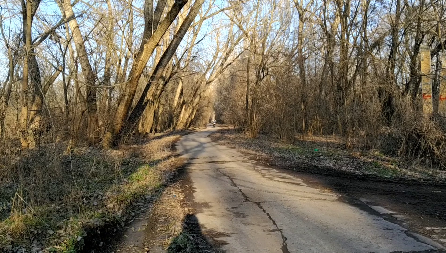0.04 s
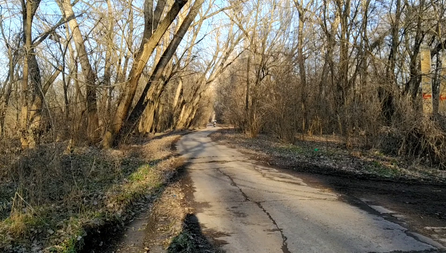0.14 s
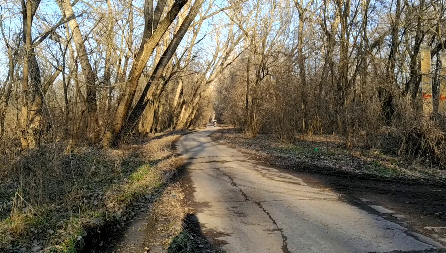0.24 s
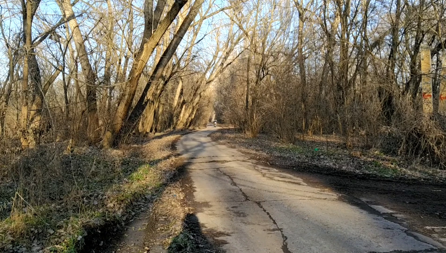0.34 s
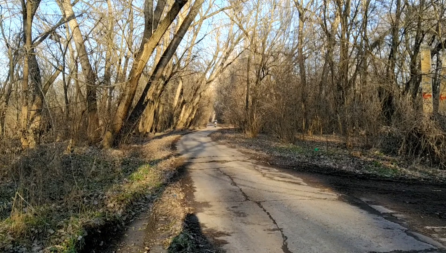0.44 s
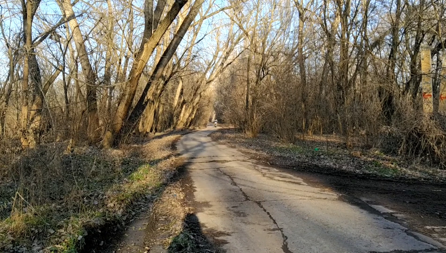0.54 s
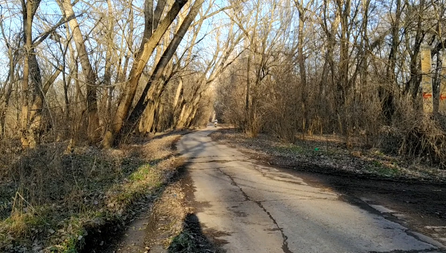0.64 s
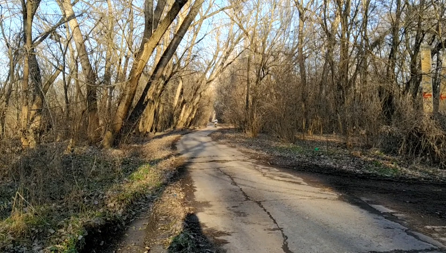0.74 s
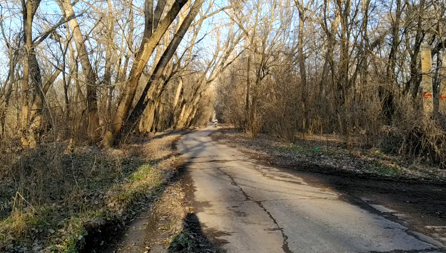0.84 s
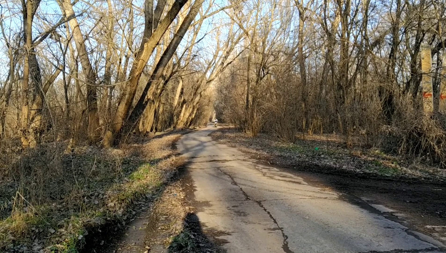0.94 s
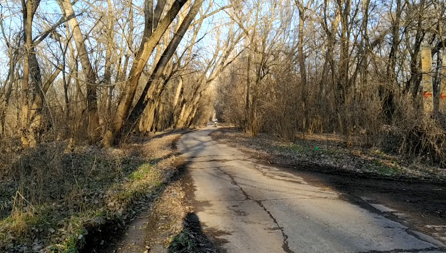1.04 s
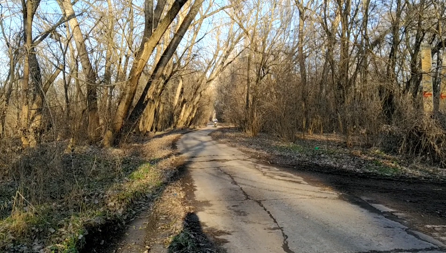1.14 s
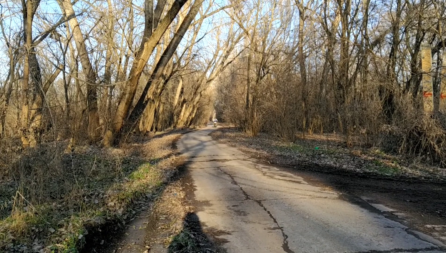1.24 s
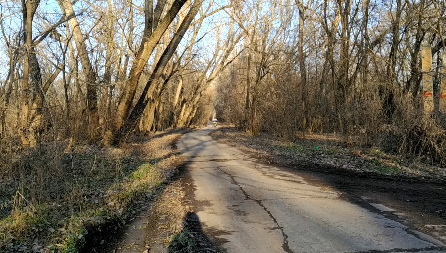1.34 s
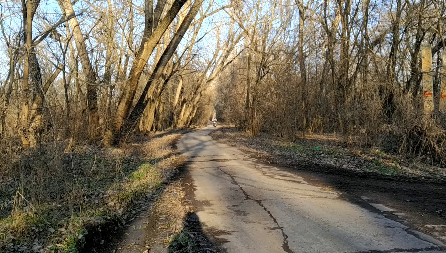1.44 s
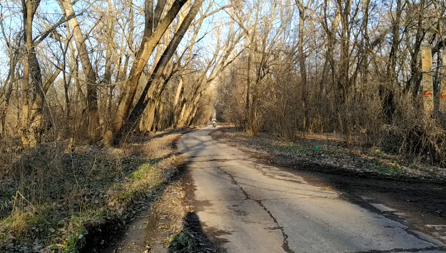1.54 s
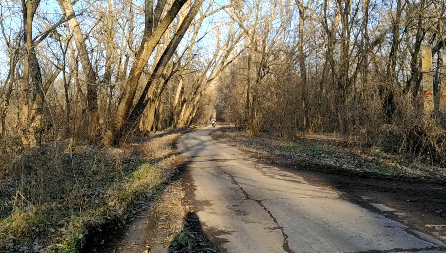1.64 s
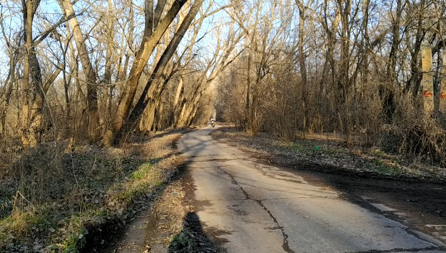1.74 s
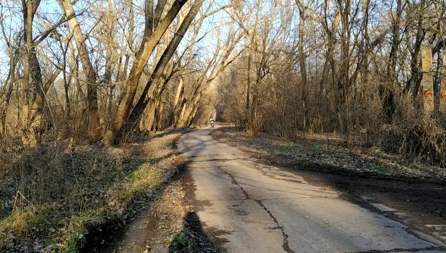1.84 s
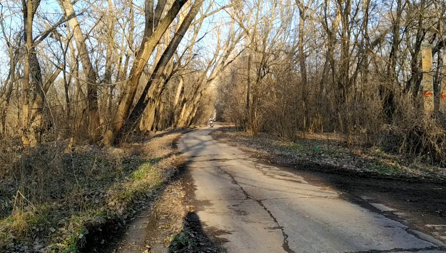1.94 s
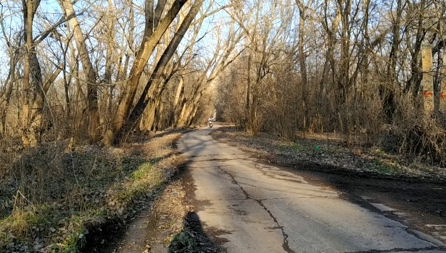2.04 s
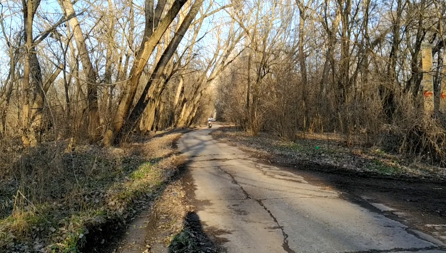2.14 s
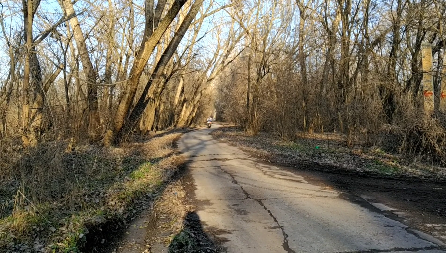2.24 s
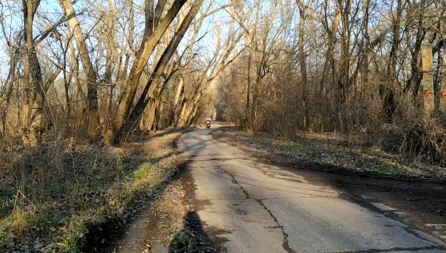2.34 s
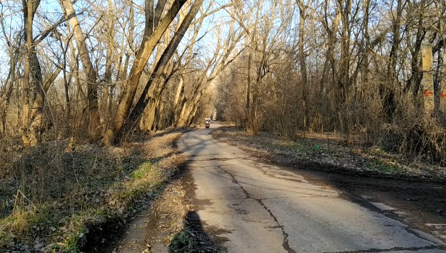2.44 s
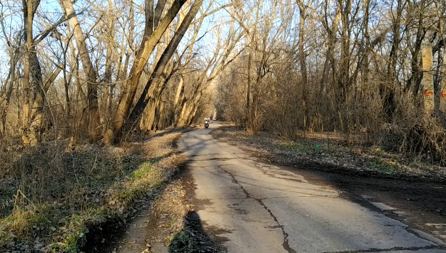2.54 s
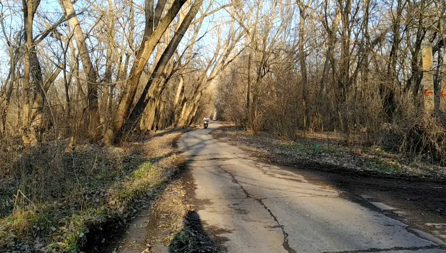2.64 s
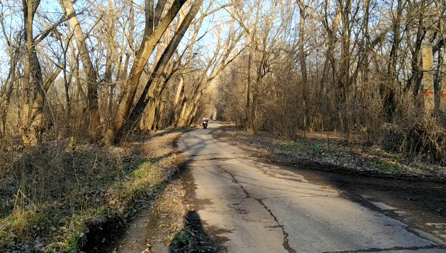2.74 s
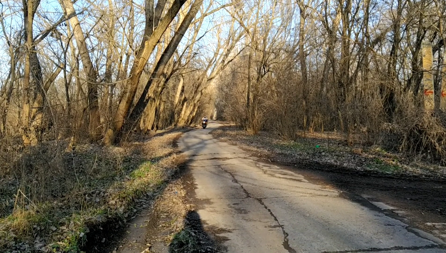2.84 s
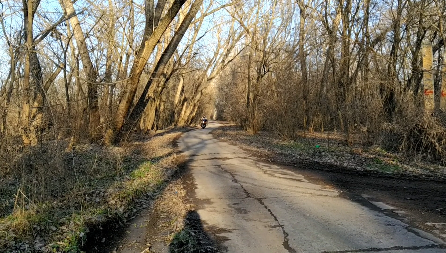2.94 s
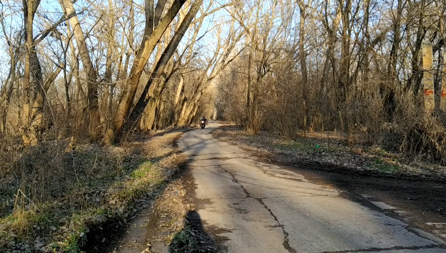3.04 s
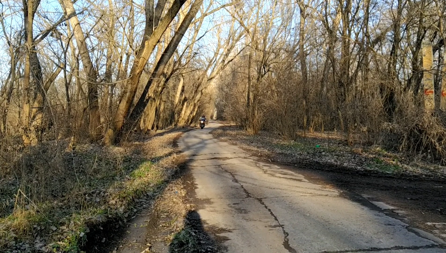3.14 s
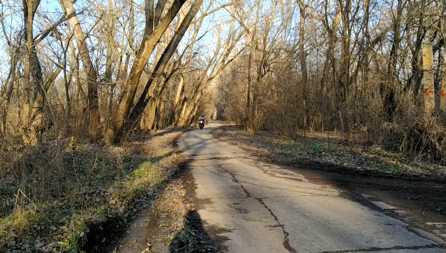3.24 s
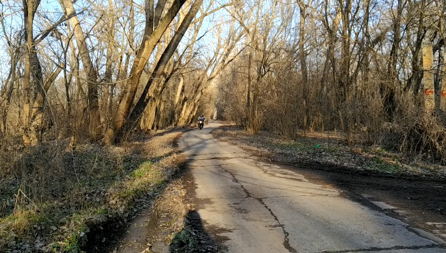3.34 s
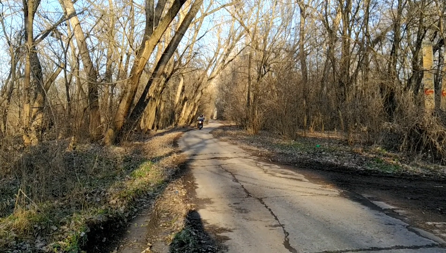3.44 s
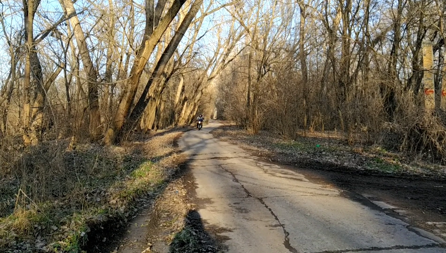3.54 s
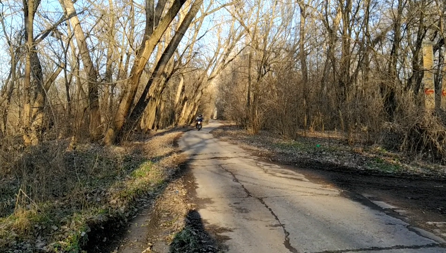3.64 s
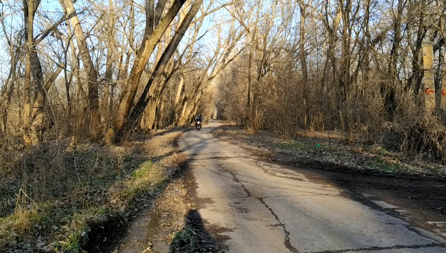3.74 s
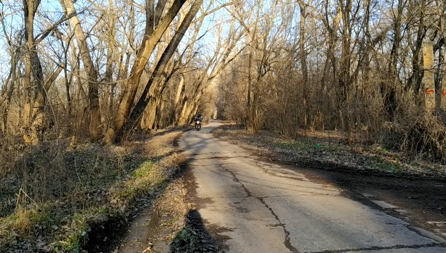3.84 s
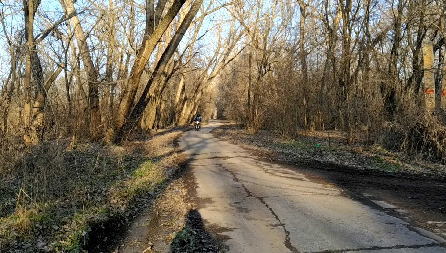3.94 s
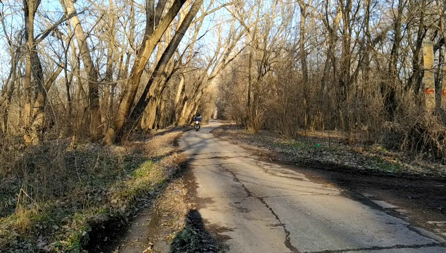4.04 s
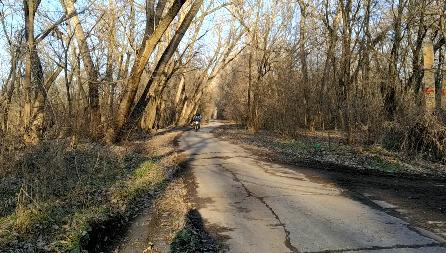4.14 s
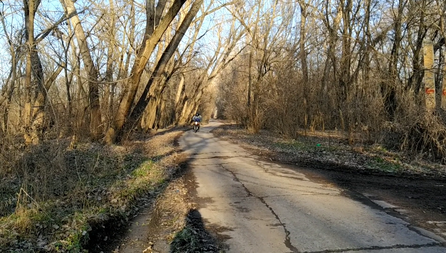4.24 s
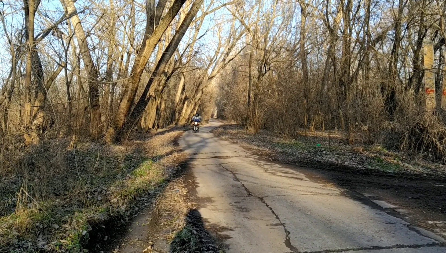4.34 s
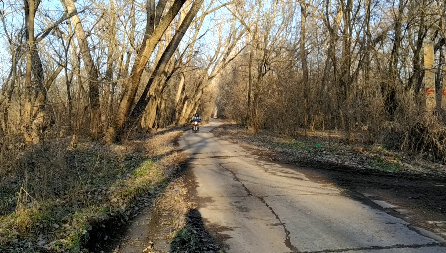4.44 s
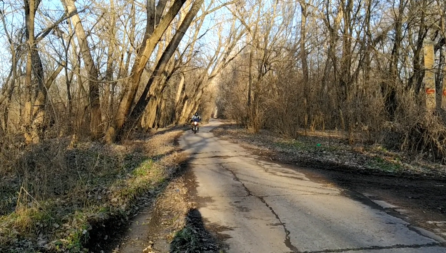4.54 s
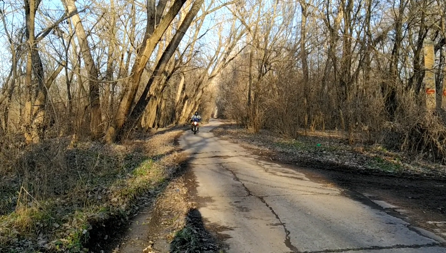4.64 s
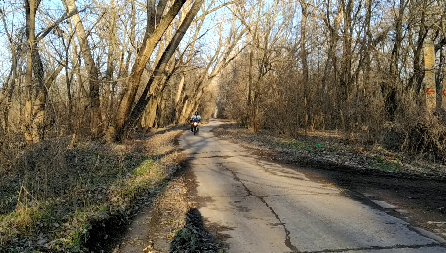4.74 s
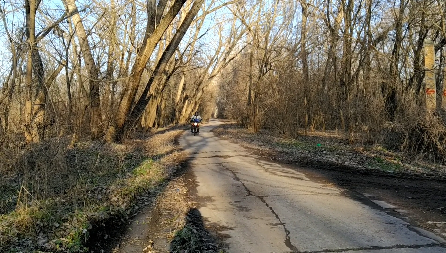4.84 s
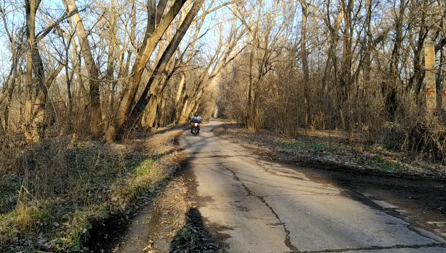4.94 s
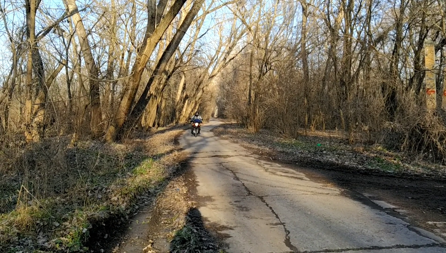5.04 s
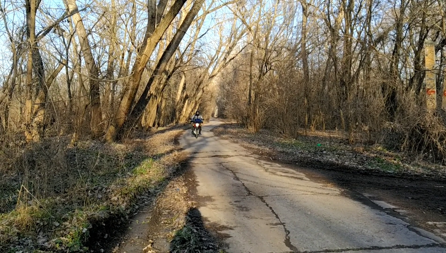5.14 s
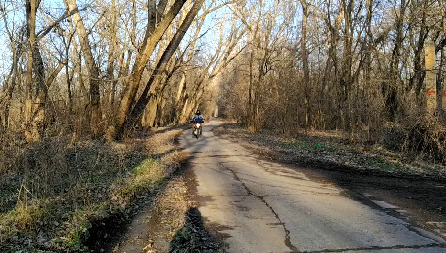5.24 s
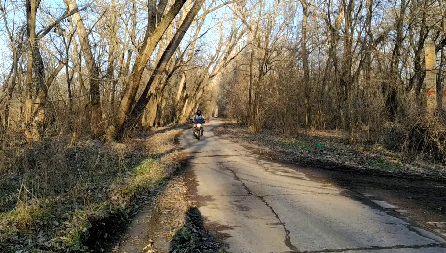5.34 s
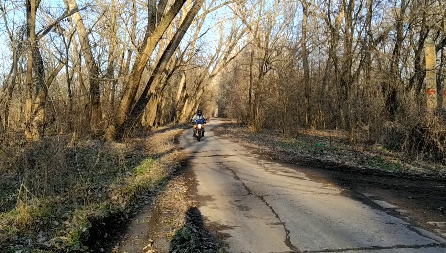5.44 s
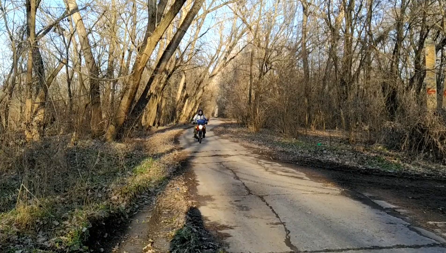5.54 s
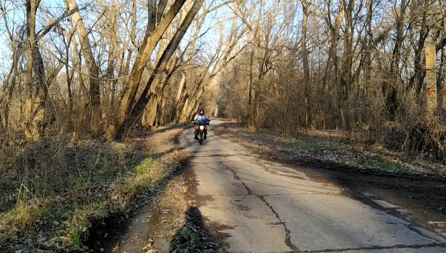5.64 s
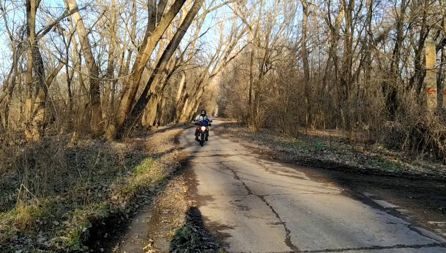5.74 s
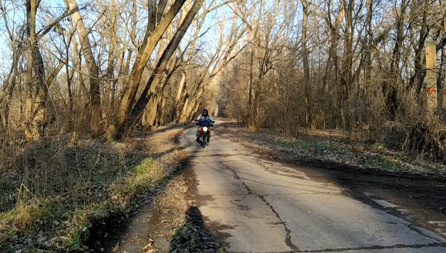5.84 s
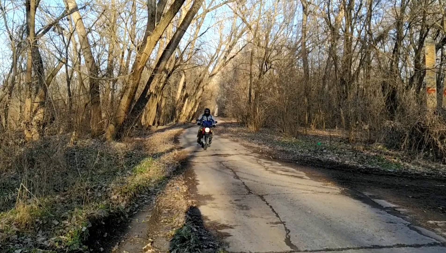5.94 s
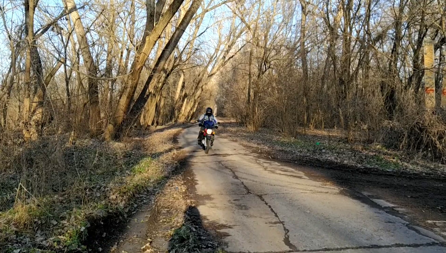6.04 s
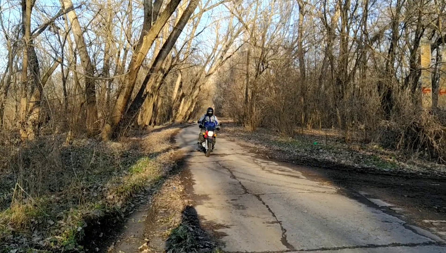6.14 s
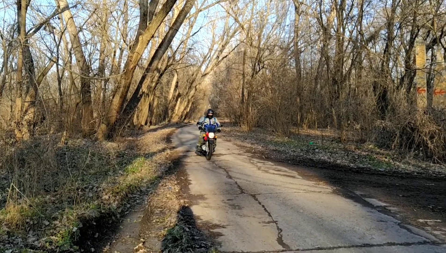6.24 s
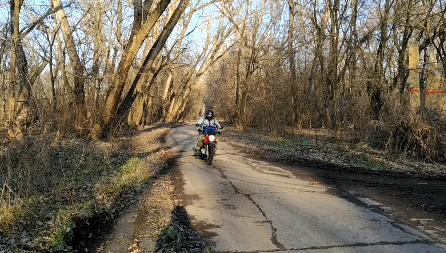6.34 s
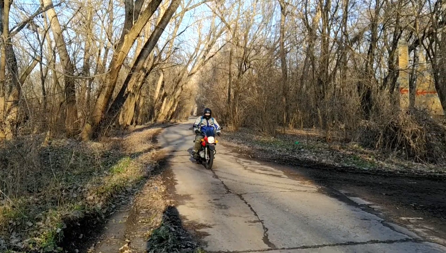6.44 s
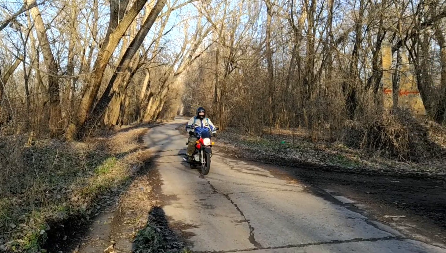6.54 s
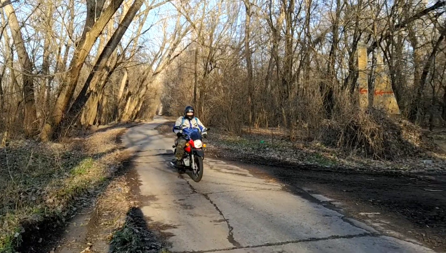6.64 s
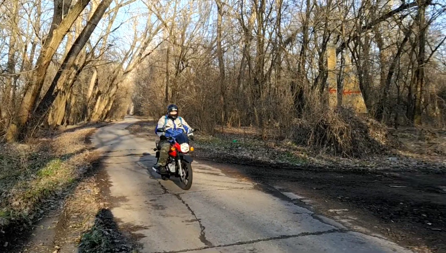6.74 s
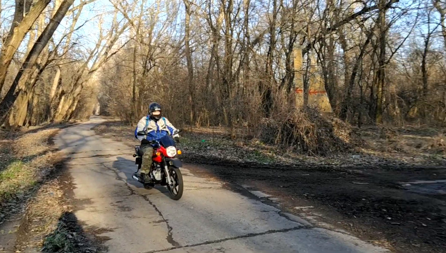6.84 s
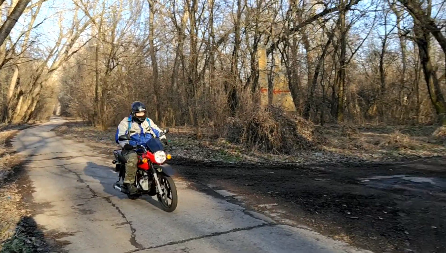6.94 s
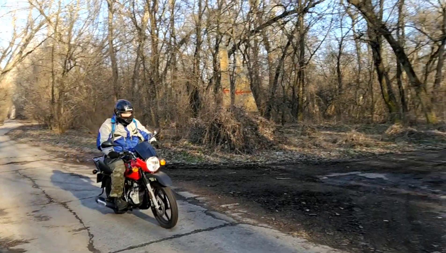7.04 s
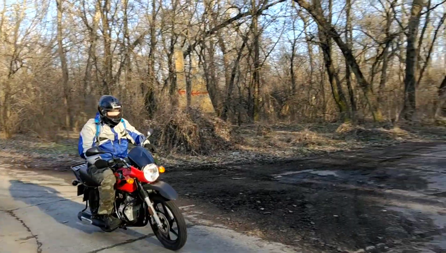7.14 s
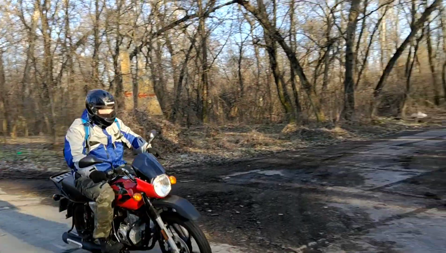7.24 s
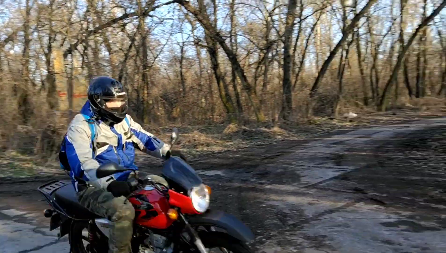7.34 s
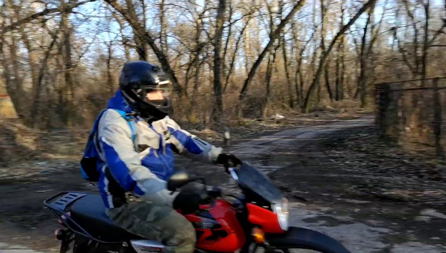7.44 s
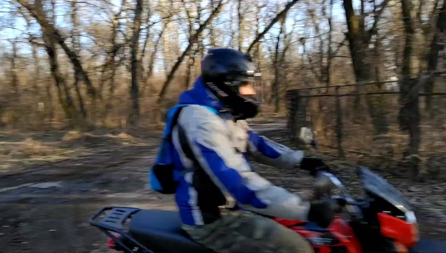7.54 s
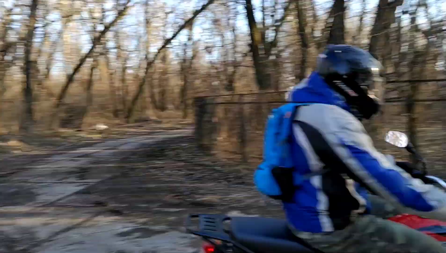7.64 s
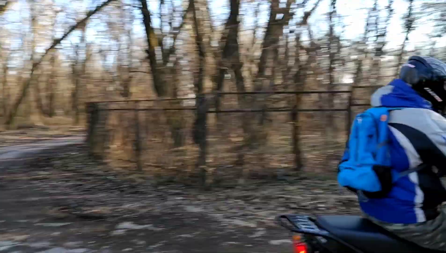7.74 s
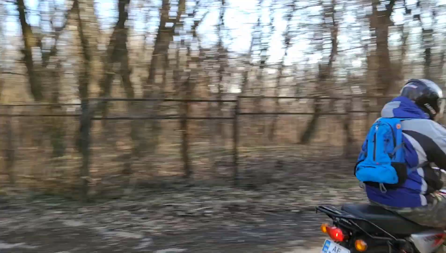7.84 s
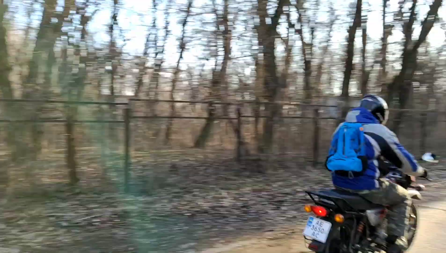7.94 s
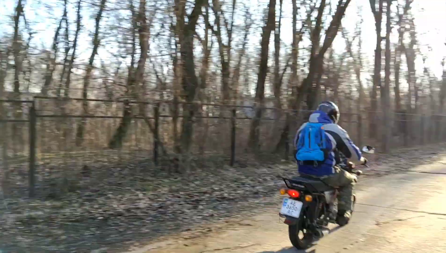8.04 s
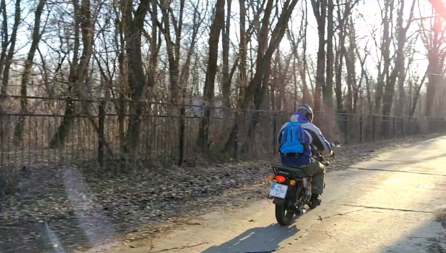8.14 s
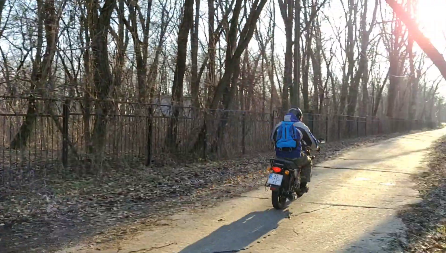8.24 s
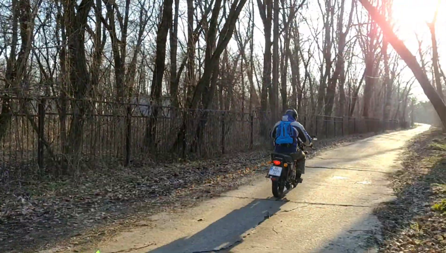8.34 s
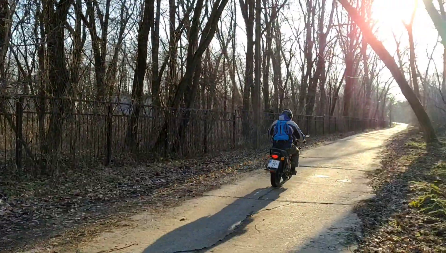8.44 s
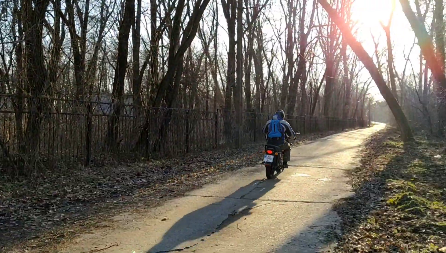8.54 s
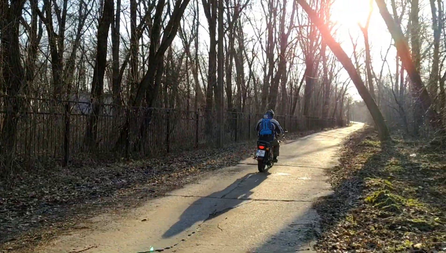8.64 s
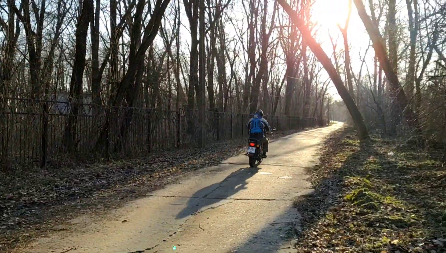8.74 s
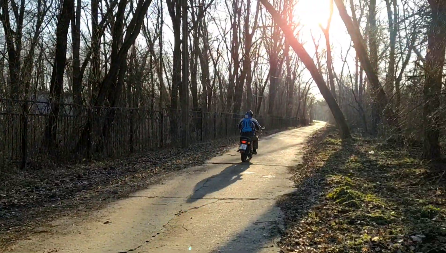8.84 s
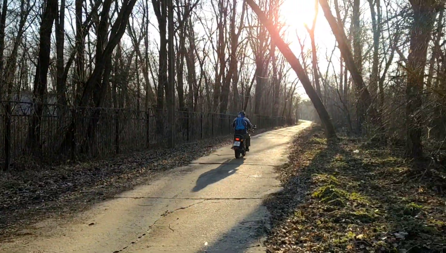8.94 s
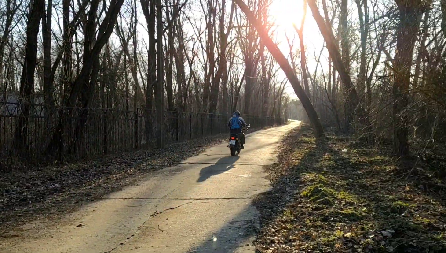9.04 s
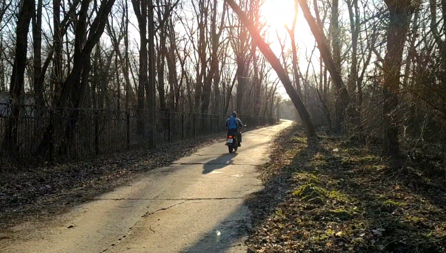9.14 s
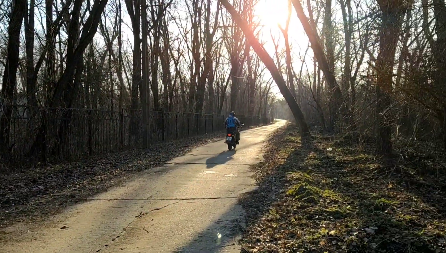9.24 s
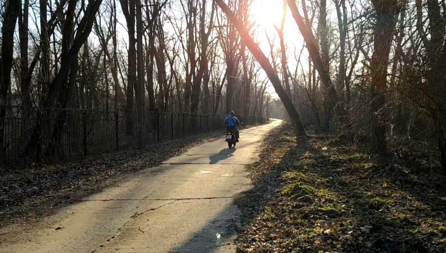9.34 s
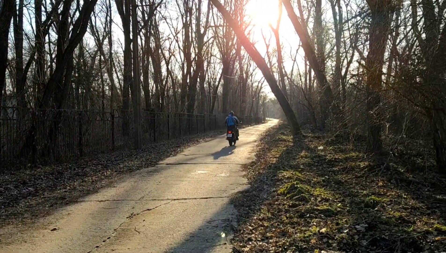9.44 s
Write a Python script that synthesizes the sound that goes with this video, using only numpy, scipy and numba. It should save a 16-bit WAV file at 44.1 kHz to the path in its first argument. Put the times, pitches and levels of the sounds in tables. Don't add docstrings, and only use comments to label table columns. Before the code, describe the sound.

Thumping small motorbike exhaust grows over faint wind and ticking twigs, eases off, then surges past with tyre hiss and recedes down the path.

```python
import sys
import numpy as np
from scipy import signal
from scipy.fft import rfft, irfft, next_fast_len
from scipy.io import wavfile
from scipy.ndimage import uniform_filter1d, map_coordinates
from numba import njit

SR = 44100
rng = np.random.default_rng(int(sys.argv[2]) if len(sys.argv) > 2 else 0)


def dump(signal):
    limited = np.clip(np.atleast_2d(signal).T, -1, 1)
    pcm = np.round(limited * 32767).astype(np.int16)
    wavfile.write(sys.argv[1], SR, pcm)


def invert_db(level):
    return 10 ** (np.asarray(level, dtype=float) / 20)


N = 418852


def curves(table):
    s, *columns = np.transpose(table)
    return [np.interp(np.arange(N) / SR, s, c) for c in columns]


def read(table, hz):
    f, v = np.transpose(table)
    return np.interp(np.log(np.maximum(hz, 1)), np.log(f), v)


def unit(x):
    return x / np.sqrt(np.mean(x ** 2))


def shape(x, gain):
    size = next_fast_len(N + 4096)
    return irfft(rfft(x, size) * gain(np.arange(size // 2 + 1) * SR / size), size)[..., :N]


def lowpass(hz, edge_hz, order):
    return 1 / (1 + (hz / edge_hz) ** order)


def walk(rate_hz):
    k = int(SR / rate_hz)
    held = np.repeat(rng.standard_normal(N // k + 1), k)
    return 1.46 * uniform_filter1d(uniform_filter1d(held, k), k)[:N]


def bump(s, half_s):
    return np.exp(-((np.arange(N) / SR - s) / half_s) ** 2)


@njit
def svf(x, hz, width):
    y, b, l = np.empty(len(x)), 0., 0.
    for i in range(len(x)):
        g, k = np.tan(np.pi * hz[i] / SR), width / hz[i]
        v = (b + g * (x[i] - l)) / (1 + g * (g + k))
        b, l, y[i] = 2 * v - b, l + 2 * g * v, k * v
    return y


def distance():
    pass_s, speed_m_s, nearest_m = 7.727, 6.63, 2.505
    return np.hypot(nearest_m, speed_m_s * (np.arange(N) / SR - pass_s))


def stance():
    # start_s, end_s, share_0_1
    coasts = [
        (-.2, 0.897, 0.28),
        (5.205, 6.29, 1),
    ]
    near_m, rear_shows_s, rear_takes_s, throttle_s = 8.9, 7.59, 0.53, 0.071
    t, r_m = np.arange(N) / SR, distance()

    def step(at_s, takes_s):
        return .5 + .5 * np.tanh((t - at_s) / takes_s)
    shut = sum(share * step(a, throttle_s) * (1 - step(b, throttle_s)) for a, b, share in coasts)
    rear = step(rear_shows_s, rear_takes_s)
    return np.array([np.ones(N), shut, rear, 1 / (1 + (r_m / near_m) ** 2), r_m / 10])


def firings(hz, jitter_s, scatter_db):
    cycles = np.cumsum(hz) / SR
    at = np.flatnonzero(np.diff(np.floor(cycles)))
    early_late, size = rng.standard_normal((2, len(at)))
    moved = at + (jitter_s[at] * SR * early_late).astype(int)
    pulses = np.zeros(N)
    pulses[np.clip(moved, 0, N - 1)] = invert_db(scatter_db * size)
    return pulses, cycles % 1


def woods(x, t60_s):
    t = np.arange(8192) / SR
    echoes = rng.standard_normal((2, len(t))) * np.exp(-np.log(1000) * t / t60_s) * (t > .007)
    first, second = signal.fftconvolve(x[None], echoes, axes=1)[:, :N]
    turn = 2 * walk(3)
    return unit(np.cos(turn) * first + np.sin(turn) * second)


def exhaust(pulses, rate_hz, level_db, view):
    # hz, level_db
    thump = [(20, -40), (39, 0), (78, 9), (117, 8.5), (195, 3), (270, 7.5), (320, 8.5), (360, -6.5),
             (440, -34), (500, -14.5), (590, -15), (650, -15.5), (720, -15.5), (960, -19), (3500, -32)]
    # level_db, shut_db, rear_db, close_db, per_10m_db
    pipe_parts = [
        (-37, -2, 4.1, 5.5, 0.98),
        (-41, 15.5, 15, -2, .1),
        (-28.5, -1, 1.4, 3, 0.15),
        (-36, 4, 10.6, 1.5, 0.089),
        (-25.5, -8.5, 0.11, -5.5, 0.058),
        (-34.5, 1, 0.75, 6, .1),
    ]
    edges, pipe_top_hz, bark_top_hz = (3.5, 4.5, 5.5, 6.5), 340, 2200
    patchy_db, misfire_db = 1.7, .6
    shut, rear = view[1], view[2]
    rung = pulses + 1.3 * svf(pulses, np.full(N, 225.), 55.)
    dip = unit(-shape(rung, lambda hz: invert_db(read(thump, hz))))
    echo = woods(dip, .1)
    wet = np.clip(.16 + distance() / 40, 0, .3) + .2 * shut + .08 * (1 - rear)
    thinned_echo = shape(echo, lambda hz: 1 - .7 * lowpass(hz, 175, 12))
    heard = np.sqrt(1 - wet ** 2) * dip + wet * thinned_echo

    mean_hz = np.mean(rate_hz)
    angle = np.cumsum(rate_hz) / mean_hz
    even = np.interp(np.arange(N), angle, heard)
    below = [0 * dip]
    for edge in edges:
        low = shape(even, lambda hz: lowpass(hz, mean_hz * edge, 24))
        below.append(np.interp(angle, np.arange(N), low))
    below.append(shape(heard, lambda hz: lowpass(hz, pipe_top_hz, 16)))
    parts = [unit(high - low) for low, high in zip(below, below[1:])]

    parts[0] = unit(shape(dip, lambda hz: np.exp(-2j * np.pi * hz * .0025) * lowpass(hz, mean_hz * edges[0], 16)))
    parts.append(unit(shape(.8 * dip + echo, lambda hz: (1 - lowpass(hz, pipe_top_hz, 16))
                            * lowpass(hz, bark_top_hz, 2))))
    waver_db = patchy_db * wet / 0.51 + misfire_db * shut
    levels_db = np.array(pipe_parts) @ view
    return invert_db(level_db) * sum(invert_db(db + waver_db * walk(17)) * part for db, part in zip(levels_db, parts))


def rush(phase, roar_db, clatter_db, hiss_db, pan_db, hum_db):
    rush_hz = (800, 2600, 8500)
    # hz, likeness_0_1
    likeness = [(60, 0.95), (300, 0.97), (700, 0.78), (1100, 0.96), (1500, 0), (2300, 0.85), (3500, 0.01),
                (4500, 0.2), (6000, 0.2), (8500, 0.55), (11000, 0)]
    hum_hz = 513
    out, gust = 0, walk(5)
    puff = np.cos(2 * np.pi * phase) + 1.16 * np.cos(4 * np.pi * phase)
    for hz in 40 * 2 ** np.arange(0, 8.6, 1 / 3):
        place = np.interp(np.log(hz), np.log(rush_hz), np.arange(3))
        tilt_db = clatter_db * (1 - abs(place - 1)) + hiss_db * max(place - 1, 0)
        tilt_db = tilt_db + hum_db * np.exp(-(np.log(hz / hum_hz) / 0.37) ** 2)
        band = signal.butter(2, (hz / 1.12, hz * 1.12), "band", fs=SR, output="sos")
        mid, side = signal.sosfilt(band, rng.standard_normal((2, N)))
        like = np.clip(read(likeness, hz), 0, 1)
        pair = np.sqrt(1 + like) * mid + np.sqrt(1 - like) * side * np.array([[1], [-1]])
        lean_db = min(hz / 1500, 1) * np.array([pan_db, -pan_db]) / 2
        flicker_db = 0.63 * gust + 0.5 * walk(8) + 1.16 * walk(16)
        throb_db = (0.44 + .5 * (500 < hz < 3000)) * puff
        out = out + invert_db(tilt_db + lean_db + flicker_db + throb_db) * pair
    return out * invert_db(roar_db + 9.0)


def rings(hz, pulses, roar_db, view):
    # level_db, shut_db, rear_db, close_db, per_10m_db
    ring_parts = [
        (-0.5, -2.5, -8.5, -7.5, -2.5),
        (-0.5, -18, -1, -20, -2.5),
        (-14, 8, -5, -28, 0.5),
        (-33.5, -6, 4, 32.5, -19),
        (-11.5, 3.5, 7, -1, 0.15),
        (-22, -1, -13, 20, 1.5),
        (-26, 5, 20.5, -4, 2.5),
    ]
    mesh_order = 32.6
    whine_db, shell_db, cover_db, fin_db, valve_db, intake_db, mouth_db = np.array(ring_parts) @ view
    steady, blows = np.ones(N), unit(pulses * invert_db(1.3 * walk(20)))

    def ring(centre_hz, width_hz, struck=0):
        push = struck * blows + rng.standard_normal(N)
        return unit(svf(svf(push, centre_hz, width_hz), centre_hz, width_hz))
    mesh_hz = 1275 * np.sqrt(mesh_order * hz / 1275)
    whine = invert_db(whine_db + 1.6 * walk(13)) * ring(mesh_hz, 55., 1.2)
    shell = invert_db(shell_db) * ring(775 * (1 + .008 * walk(3)), 50., 2.4)
    cover = ring(870 * (1 + .006 * walk(3)), 40., 2.4) + .7 * ring(1025 * (1 + .015 * walk(3)), 60., 1.5)
    intake = invert_db(intake_db) * ring(590 * steady, 58.0, 2.2)
    mouth = invert_db(mouth_db) * sum(ring(mode_hz * steady, 48.0, 1.35) for mode_hz in (495, 720, 960))
    fins = invert_db(fin_db) * ring(2680 * steady, 280.0)
    valves = invert_db(valve_db) * ring(8650 * steady, 1100.)
    shared = shell + invert_db(cover_db + 4) * cover + intake + mouth
    left = whine + shared + 1.61 * fins + 1.8 * valves
    right = 0.67 * whine + shared + 0.38 * fins + 0.51 * valves
    return invert_db(roar_db) * np.array([left, right])


def air():
    rumble = shape(rng.standard_normal(N), lambda hz: hz ** 2 / (hz ** 2 + 53.0 ** 2) * lowpass(hz, 90., 4))
    return invert_db(-69.5 + 1.7 * walk(3.04)) * unit(rumble)


def snaps(events, decay_s):
    out, t = np.zeros(N), np.arange(900) / SR
    for s, db, hz in events:
        noise = rng.standard_normal(900) * np.exp(-t / decay_s)
        centre_hz = np.full(900, 1. * hz)
        snap = svf(svf(noise, centre_hz, 0.53 * hz), centre_hz, .5 * hz)
        out[int(s * SR):int(s * SR) + 900] += invert_db(db + 1.5) * snap / np.abs(snap).max()
    return out


def twigs():
    # start_s, peak_db, centre_hz
    ticks = [(0.2594, -53, 8600), (0.4618, -47, 8700), (0.8194, -51, 7920), (0.8196, -51, 3000),
             (1.3104, -40, 8670), (1.5994, -49, 8150), (2.397, -42, 8700), (2.4648, -42, 8450),
             (2.5117, -42, 3580), (2.5794, -47, 6630), (2.6314, -46, 7590), (2.6794, -50, 2990),
             (2.7317, -48, 2560), (4.8094, -47, 8800)]
    return 0.59 * snaps(ticks, 0.0035)


def leaf_gusts():
    # centre_s, half_length_s, hiss_gain_db
    gusts = [
        (.45, 0.58, 9),
        (1.263, 0.22, 7),
        (1.7, 0.37, 3.5),
        (2.5, 0.19, 4),
        (3.252, 0.16, 4),
        (4.65, 0.064, 1),
        (5.094, 0.1, 2.5),
    ]
    return sum(db * bump(s, half_s) for s, half_s, db in gusts)


def clunks():
    # start_s, peak_db, centre_hz
    knocks = [
        (.815, -48, 520),
        (5.159, -45, 1500),
        (6.1, -38, 1254),
        (6.218, -39, 1510),
        (6.279, -41, 859),
    ]
    return snaps(knocks, 0.0062)


def late(x, lag_s):
    return map_coordinates(x, [np.arange(N) - lag_s * SR], order=3, mode="nearest")


def ports(noise, thumps):
    # hz, level_db
    left_port = [(30, -20), (120, -8.5), (190, 1), (400, -1.5), (600, -5.5), (1250, -2), (1600, -6),
                 (2700, -5), (3600, -4.5), (5500, -11), (7000, -5.5), (9000, -4.5), (10500, -4),
                 (11900, 0.5)]
    # hz, level_db
    right_port = [(30, -18), (120, -10), (190, 0.5), (400, -4), (600, -4), (1300, -1.5), (2000, -1),
                  (3000, -5.5), (3800, -7), (4500, -17.5), (6000, -8), (8800, -1.5), (10300, -5.5),
                  (11900, -21.5)]
    # hz, lead_rad
    port_lead = [(100, .05), (350, .1), (1000, .5), (1400, .8), (2000, 0), (3100, -.4), (4000, -1.1),
                 (5500, 1.5), (8500, 1.5), (11000, .2)]
    # time_s, lag_us
    phone_turn = [(0, 0), (6.1, 0), (6.6, 25), (7.15, 95), (7.5, 40), (7.7, -30), (8.1, -85), (8.8, -60),
                  (9.5, -50)]
    left = shape(late(noise[0], curves(phone_turn)[0] / 1e6), lambda hz: invert_db(read(left_port, hz)))
    right = shape(noise[1], lambda hz: invert_db(read(right_port, hz)))
    right = shape(right + thumps, lambda hz: np.exp(1j * read(port_lead, hz)))
    return np.array([left + thumps, right])


def scene():
    # time_s, firing_hz
    engine = [(0.0, 34.53), (0.08, 34.05), (1.56, 37.67), (2.09, 38.24), (3.04, 39.63), (3.46, 39.14),
              (4.07, 40.33), (4.31, 38.83), (4.57, 40.97), (4.79, 39.43), (5.13, 41.23), (5.42, 37.6),
              (5.61, 39.8), (5.79, 38.96), (7.59, 39.32), (7.96, 38.43), (8.3, 38.35), (9.5, 40.34)]
    # time_s, exhaust_db, rush_db
    effort = [(0, 0, 2.5), (.9, 0, 0), (1.7, 0.5, -0.5), (3, -2, 2), (4.1, -0.5, 1.5), (5.1, -1, 0.5),
              (6.2, -3, -1), (6.6, 4, -1), (7.1, 2.5, 1), (7.4, 1.5, 2), (7.65, 5, 4.5), (7.9, 3.5, 2),
              (8.3, 0.5, -1.5), (8.9, 2.5, -1), (9.5, 2, -1.5)]
    # level_db, shut_db, rear_db, close_db, per_10m_db
    rush_parts = [
        (-21, -1.6, -2, 0.61, -0.61),
        (-3, 0.58, 2, 2.1, -1.18),
        (-9, 0.14, 7, 9.53, -1.41),
    ]
    hum_part = (-0.79, 0.0073, 1, -0.38, -0.73)
    hz = curves(engine)[0] * (1 + .003 * walk(9))
    exhaust_db, rush_db = curves(effort)
    view = stance()
    rear, close = view[2], view[3]
    spread_db = -20 * np.log10(distance())
    roar_db, clatter_db, hiss_db = np.array(rush_parts) @ view
    roar_db = roar_db + rush_db + spread_db
    gust_db = leaf_gusts()
    bumps_db = 6.5 * rear * (1 - close) * walk(16)
    pan_db = -1.2 * (1 - rear) * (1 - close) + 0.23 * gust_db - 2.3 * bump(7.88, 0.28)
    pulses, phase = firings(hz, jitter_s=.00013 + .00022 * view[1], scatter_db=1.0)
    thumps = exhaust(pulses, hz, exhaust_db + spread_db, view)
    noise = rush(phase, roar_db + bumps_db, clatter_db - bumps_db, hiss_db + gust_db - bumps_db,
                 pan_db, np.array(hum_part) @ view)
    noise = noise + rings(hz, pulses, roar_db, view)
    return ports(noise, thumps) + air() + twigs() + clunks()


def shade(hz, s, patches, bins, frames):
    draw = rng.random((len(hz) // bins + 1, len(s) // frames + 1))
    f, t = hz[::bins, None], s[::frames]
    share = 0
    for at_s, half_s, mid_hz, half_hz, most in patches:
        share = share + most * np.exp(-((t - at_s) / half_s) ** 4 - ((f - mid_hz) / half_hz) ** 4)
    picked = draw[:len(f), :len(t)] < share
    return picked.repeat(bins, axis=0).repeat(frames, axis=1)[:len(hz), :len(s)]


def thin_stereo(x):
    # centre_s, half_length_s, centre_hz, half_width_hz, share_0_1
    shades = [(6.65, .06, 5950, 170, .9), (6.72, .025, 6950, 600, 1), (6.85, .15, 5950, 150, .25),
              (7.03, .14, 5380, 170, .6), (7.1, .32, 3700, 110, .6), (7.45, .03, 7400, 100, .9),
              (7.68, .1, 7100, 130, .5), (7.45, .3, 2950, 90, .4), (7.84, .06, 3000, 130, .7),
              (7.6, .07, 5450, 150, .4), (8.3, .13, 4200, 170, .6), (8.46, .05, 4450, 200, .8),
              (8.4, .3, 2900, 90, .6), (8.6, .05, 2800, 130, .8), (8.5, .4, 4750, 300, .2),
              (8.65, .05, 4200, 100, .8), (8.87, .07, 4500, 130, .4), (9.2, .06, 5200, 200, .4),
              (8.46, .04, 7800, 200, .4), (7.35, .04, 1950, 60, .9), (8, 1.2, 4500, 1700, .035)]
    # centre_s, half_length_s, centre_hz, half_width_hz, share_0_1
    top_patches = [(6.56, .03, 13150, 200, .9), (6.83, .07, 12500, 400, .7), (6.8, .06, 13900, 350, .4),
                   (7.02, .08, 14300, 500, .4), (7.45, .05, 14500, 350, .4), (7.7, .4, 12300, 250, .5),
                   (7.72, .14, 13100, 600, .55), (7.78, .2, 14500, 550, .7), (8.07, .09, 14300, 900, .75),
                   (7.23, .03, 14350, 150, .9), (8.27, .14, 13900, 800, .65), (8.38, .14, 13050, 400, .95),
                   (8.62, .17, 12850, 400, .85), (8.73, .09, 13900, 700, .45), (9.25, .3, 13700, 260, .85),
                   (9.17, .12, 12400, 250, .6)]
    # start_s, end_s, low_hz, high_hz
    mono_hiss = (.35, 3.5, 7600, 10000)
    weaker_db, top_db, top_hz = 8, -12, 12120
    hz, s, (mid, side) = signal.stft([x[0] + x[1], x[0] - x[1]], SR, nperseg=1024)
    rows = hz[:, None]
    mid_power, side_power = [uniform_filter1d(uniform_filter1d(abs(z) ** 2, size=4, axis=0), size=4, axis=1)
                             for z in (mid, side)]
    treble = (rows > 2600) & ((s > 5.5) | (s < 1.8))
    mid[treble & (mid_power < side_power * invert_db(-2 * weaker_db))] = 0
    side[treble & (side_power < mid_power * invert_db(-2 * weaker_db))] = 0
    mid[shade(hz, s, shades, 4, 4) | shade(hz, s, shades, 5, 3)] = 0
    start_s, end_s, low_hz, high_hz = mono_hiss
    side[(rows > low_hz) & (rows < high_hz) & (s > start_s) & (s < end_s)] = 0
    blocks = rng.random((len(hz) // 8 + 1, len(s) // 3 + 1))
    blocks = blocks.repeat(8, axis=0).repeat(3, axis=1)[:len(hz), :len(s)]
    share = .012 + .26 * (s < 1.8)
    kept = ((blocks < share) | shade(hz, s, top_patches, 5, 3)) & (rows < 15200)
    top = np.where(rows < top_hz, 1, invert_db(top_db) * kept)
    mid, side = signal.istft([mid * top, side * top], SR, nperseg=1024)[1][:, :N]
    return np.array([mid + side, mid - side]) / 2


def low_pass(x):
    return signal.sosfilt(signal.butter(12, 15600, fs=SR, output="sos"), x)


def record(dry):
    passed = shape(dry, lambda hz: 1 / (1 + (18 / (hz + 1)) ** 2))
    return low_pass(thin_stereo(passed))


dry = scene()
out = record(dry)
dump(out)
```